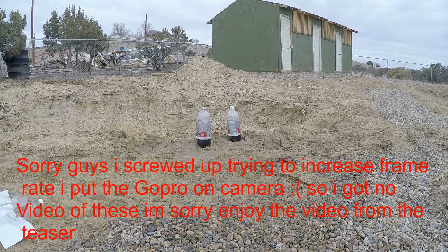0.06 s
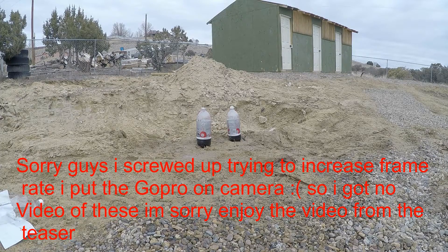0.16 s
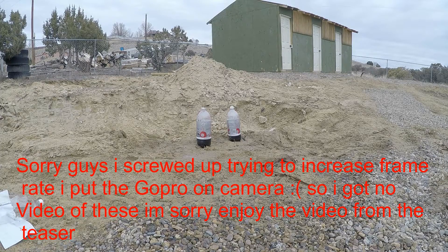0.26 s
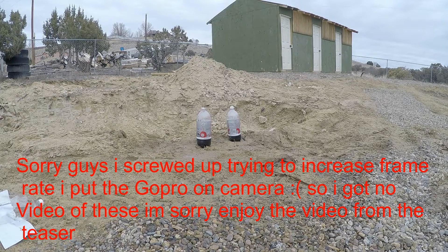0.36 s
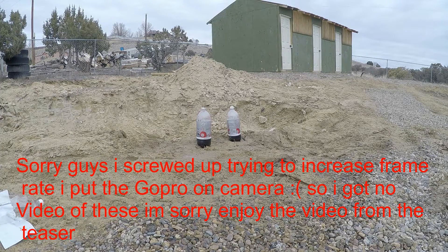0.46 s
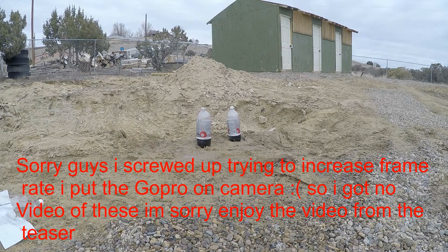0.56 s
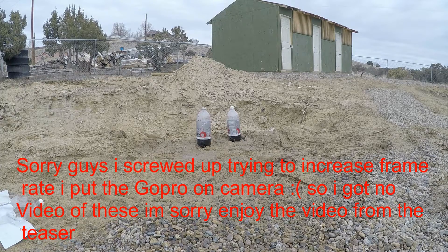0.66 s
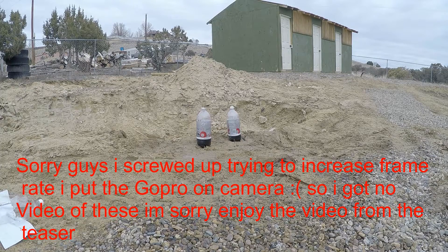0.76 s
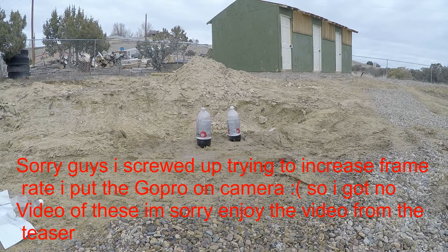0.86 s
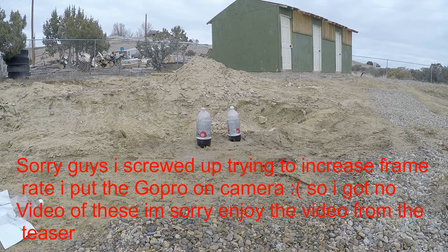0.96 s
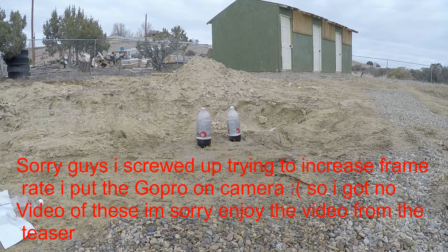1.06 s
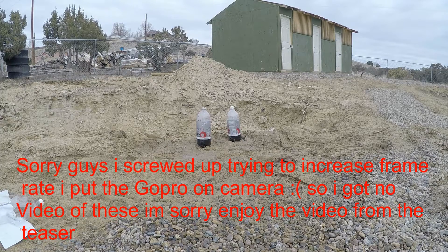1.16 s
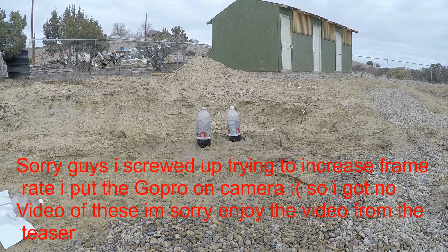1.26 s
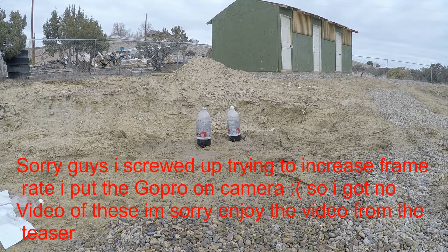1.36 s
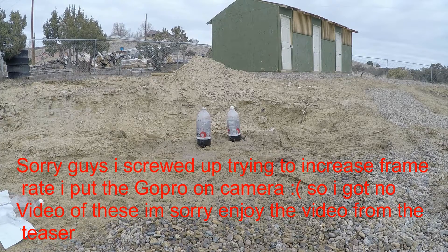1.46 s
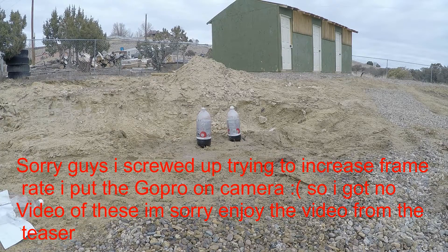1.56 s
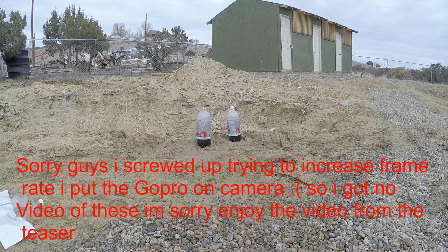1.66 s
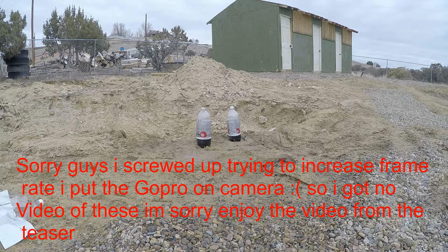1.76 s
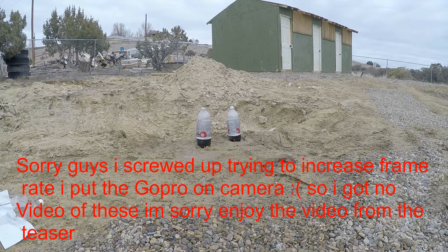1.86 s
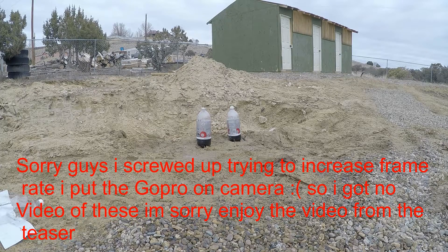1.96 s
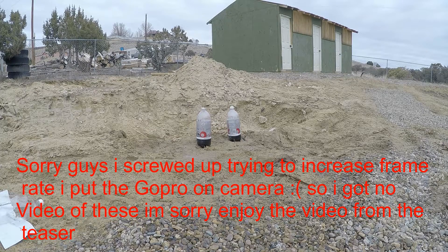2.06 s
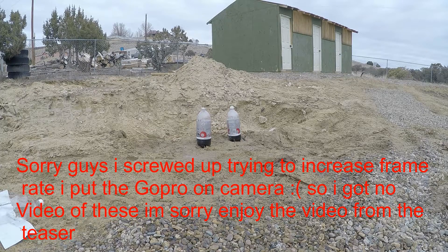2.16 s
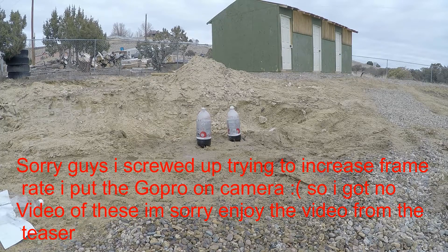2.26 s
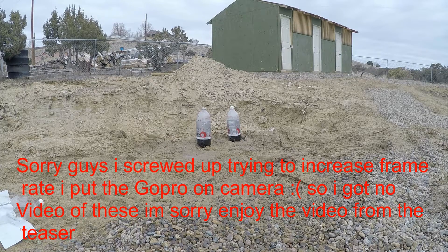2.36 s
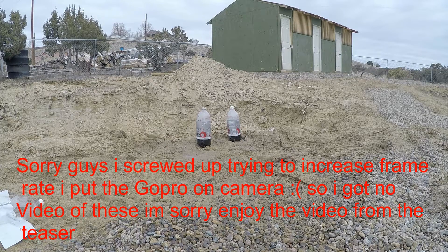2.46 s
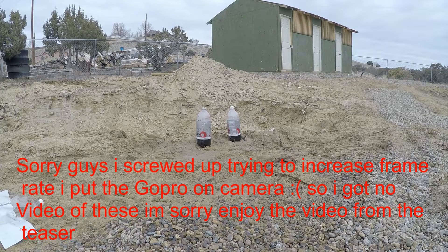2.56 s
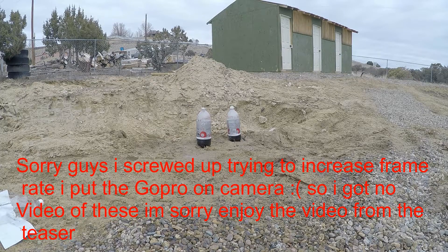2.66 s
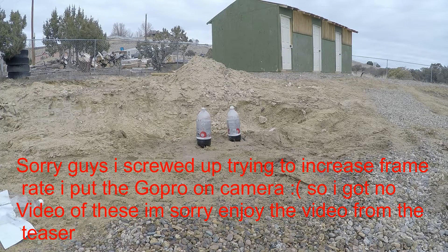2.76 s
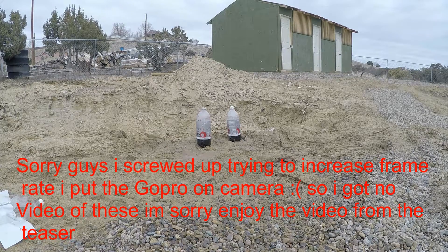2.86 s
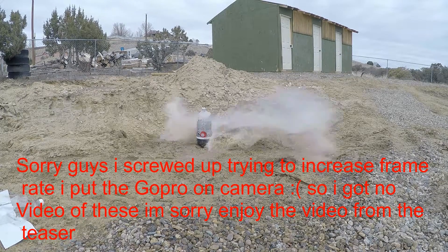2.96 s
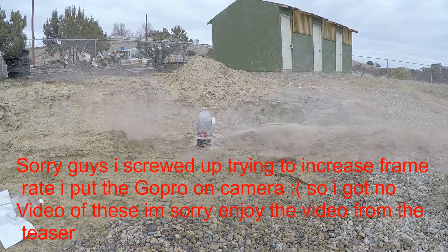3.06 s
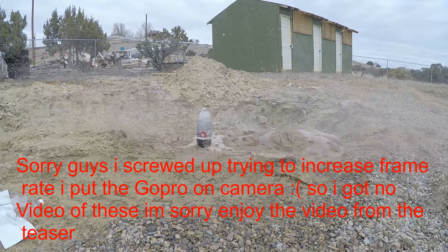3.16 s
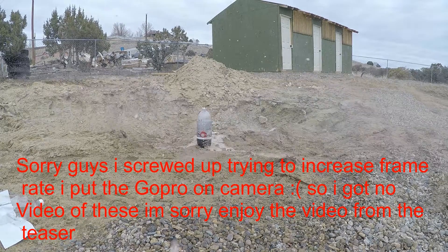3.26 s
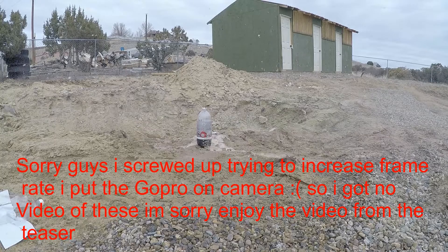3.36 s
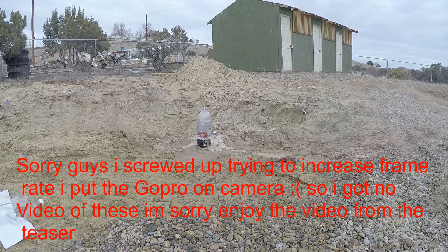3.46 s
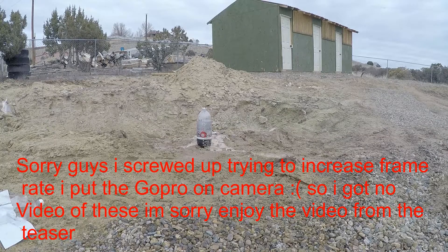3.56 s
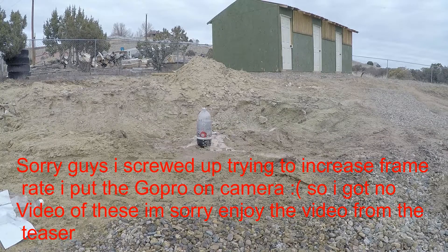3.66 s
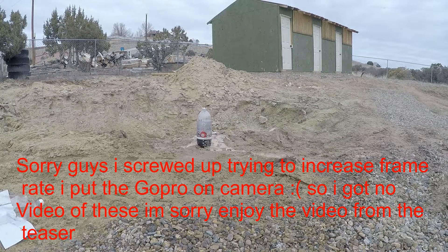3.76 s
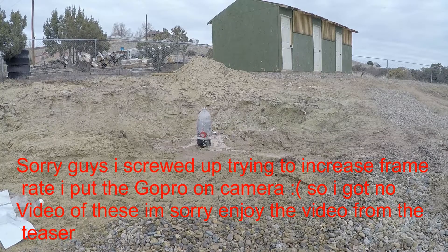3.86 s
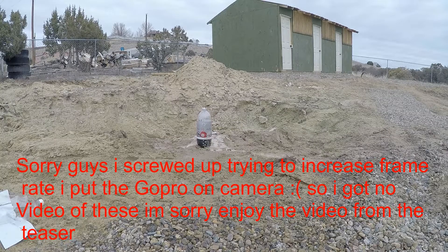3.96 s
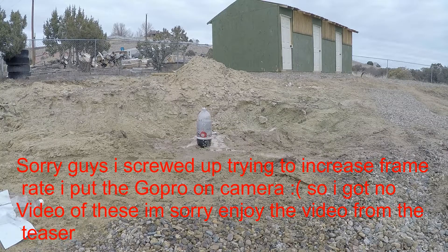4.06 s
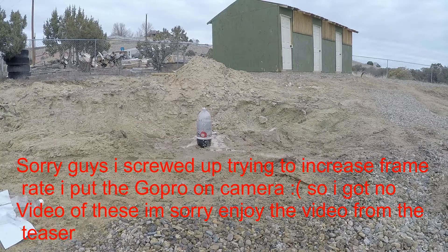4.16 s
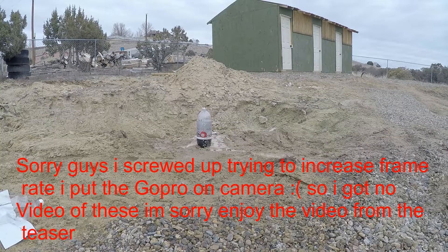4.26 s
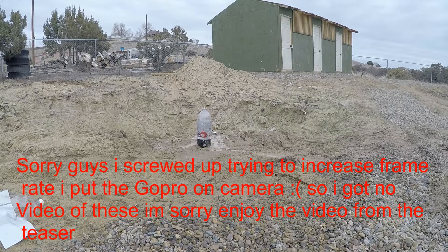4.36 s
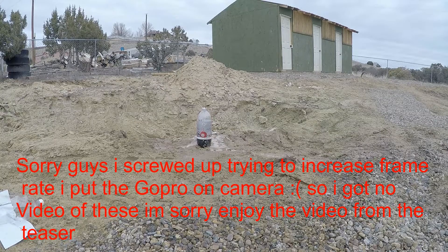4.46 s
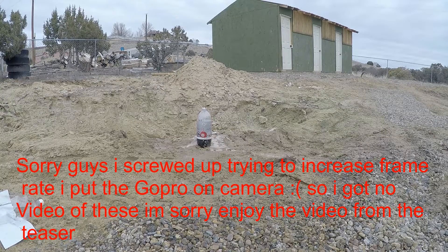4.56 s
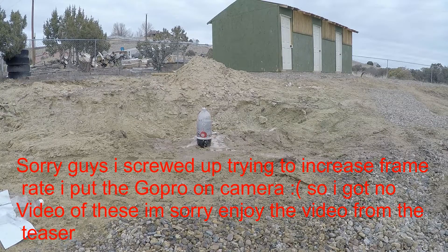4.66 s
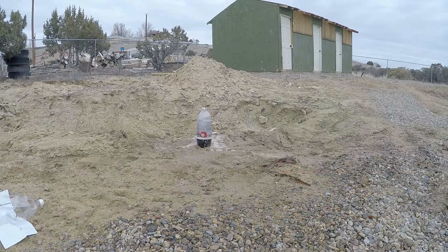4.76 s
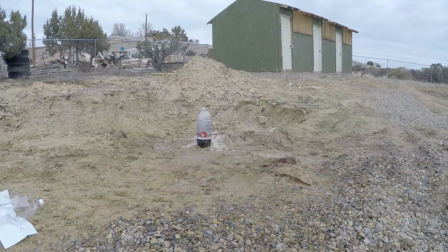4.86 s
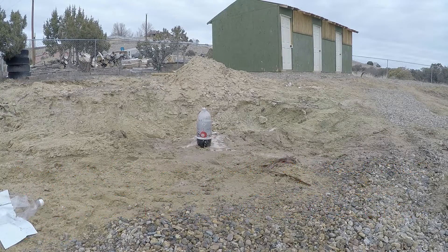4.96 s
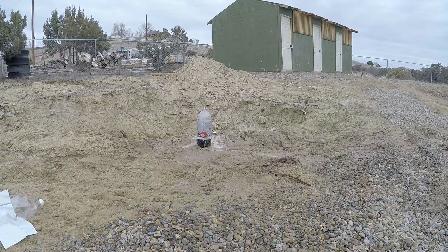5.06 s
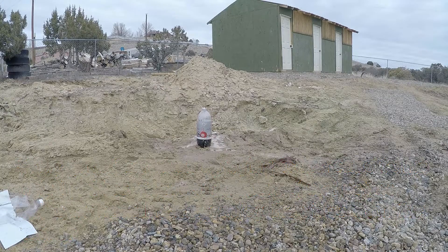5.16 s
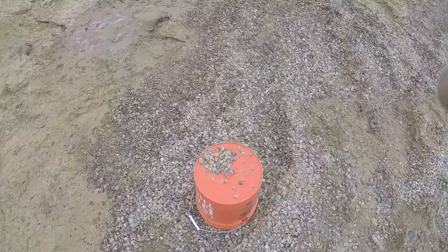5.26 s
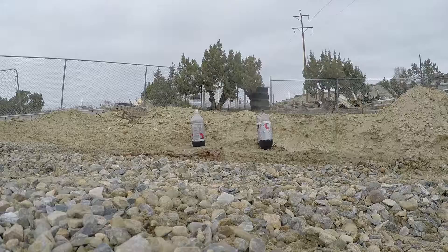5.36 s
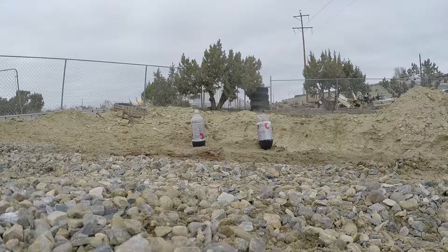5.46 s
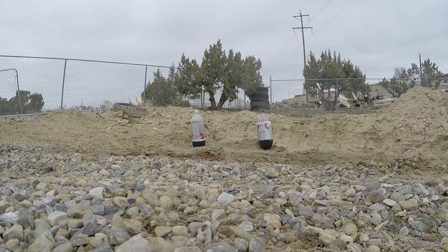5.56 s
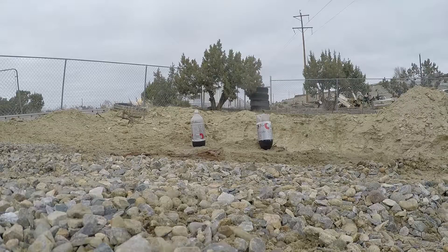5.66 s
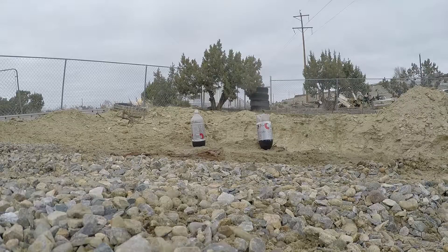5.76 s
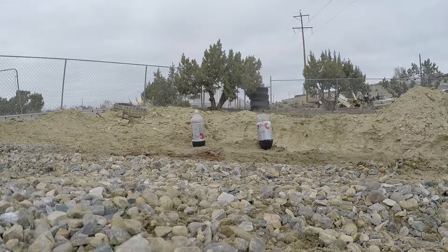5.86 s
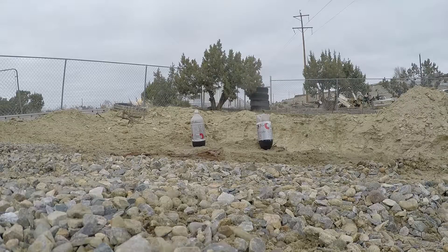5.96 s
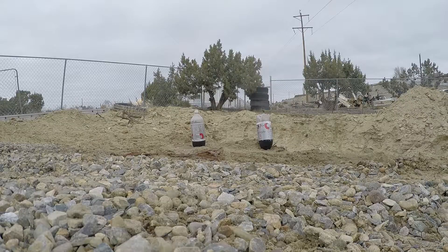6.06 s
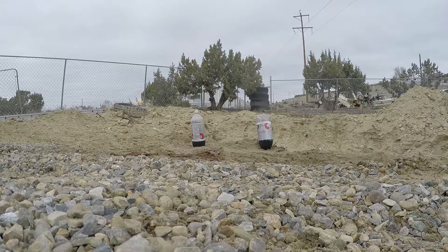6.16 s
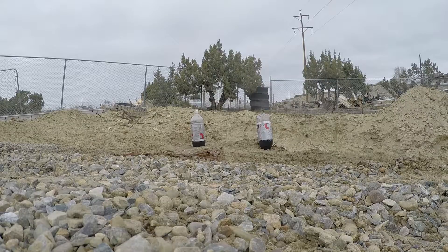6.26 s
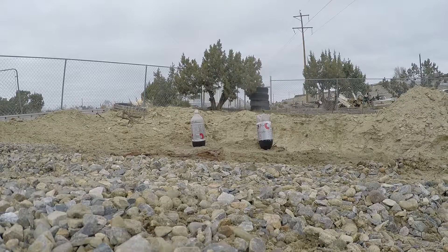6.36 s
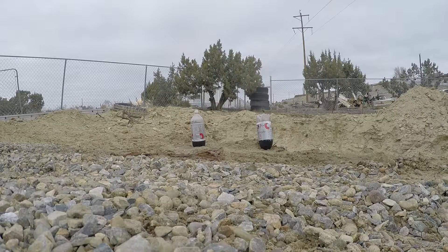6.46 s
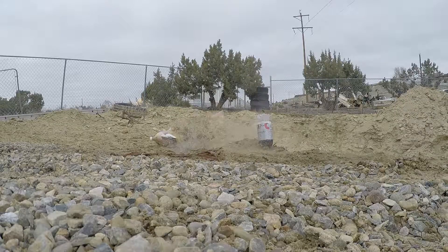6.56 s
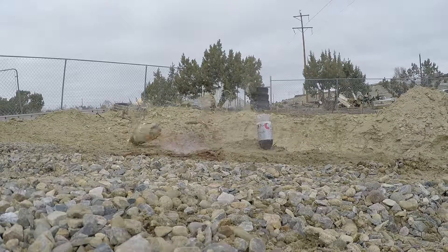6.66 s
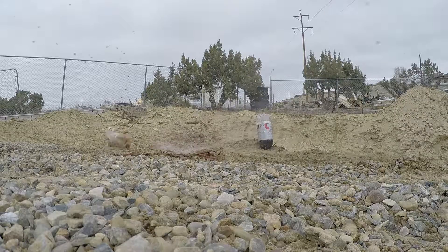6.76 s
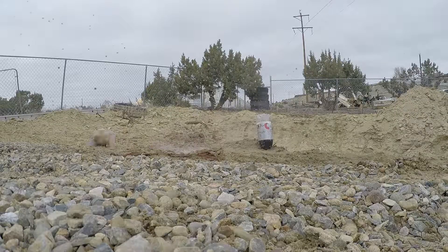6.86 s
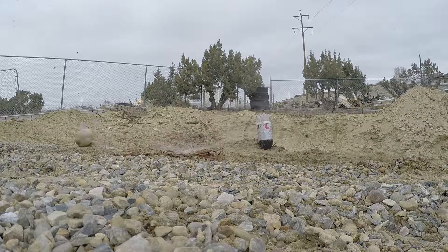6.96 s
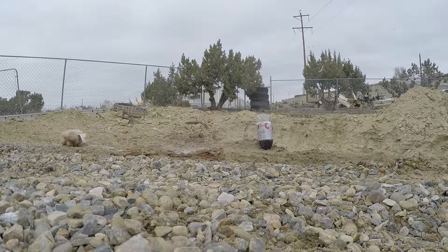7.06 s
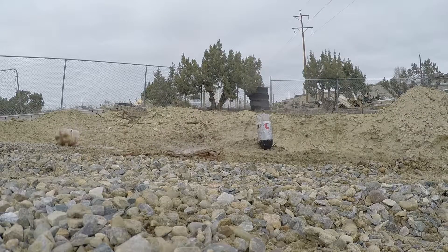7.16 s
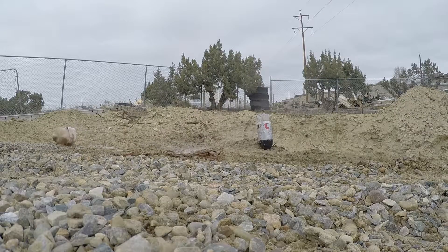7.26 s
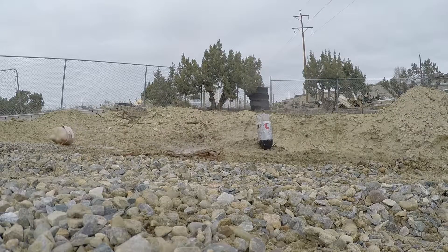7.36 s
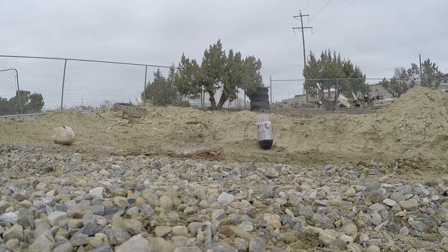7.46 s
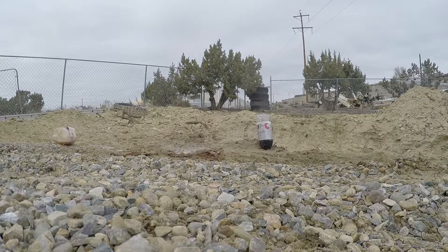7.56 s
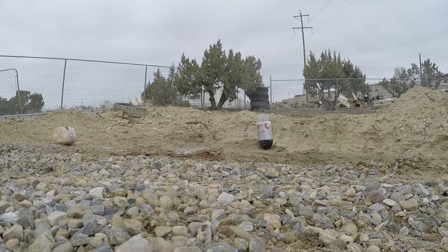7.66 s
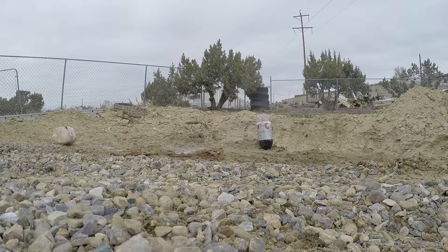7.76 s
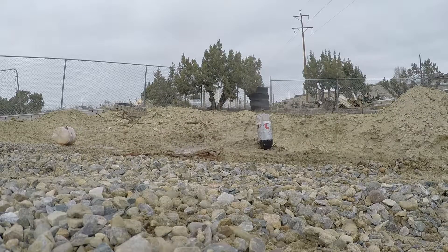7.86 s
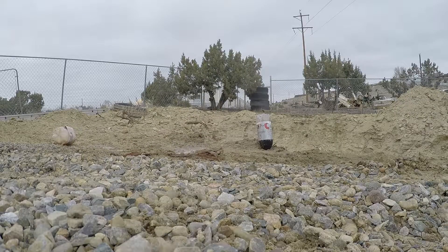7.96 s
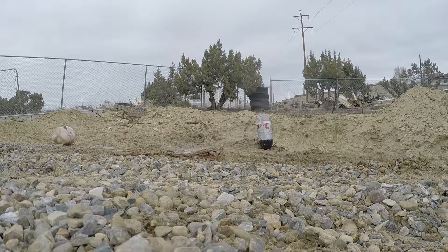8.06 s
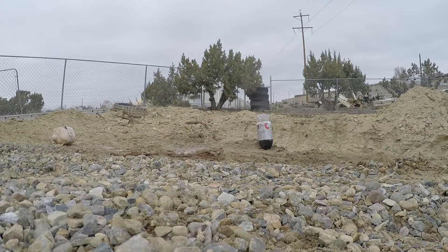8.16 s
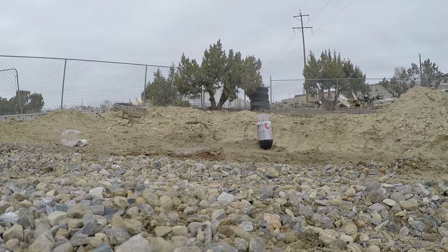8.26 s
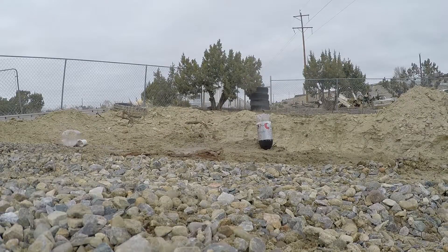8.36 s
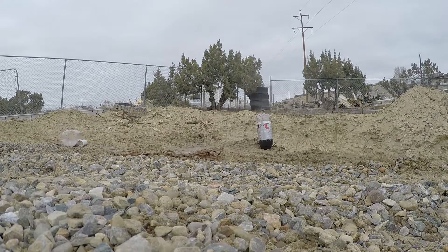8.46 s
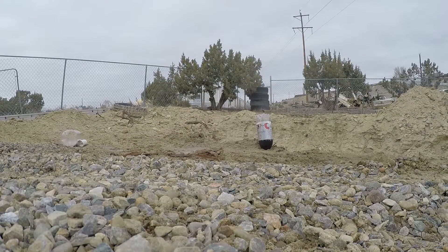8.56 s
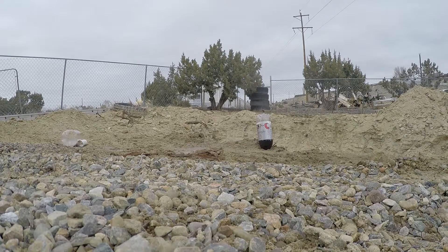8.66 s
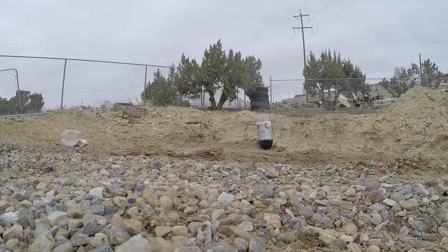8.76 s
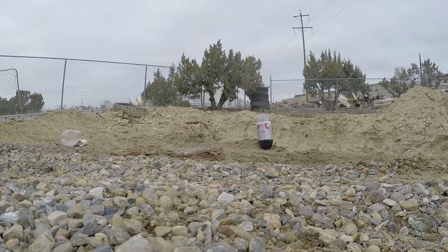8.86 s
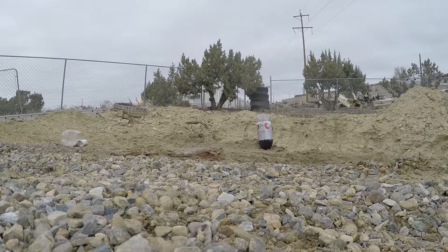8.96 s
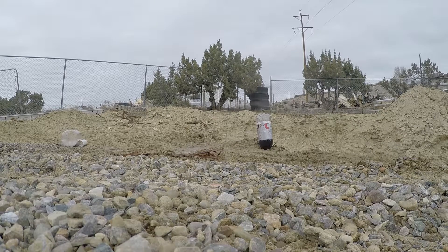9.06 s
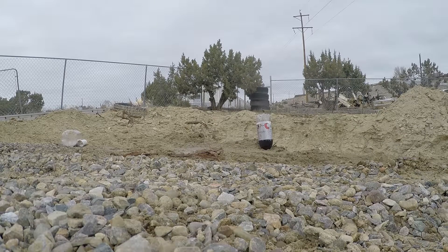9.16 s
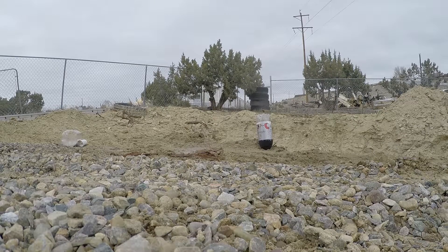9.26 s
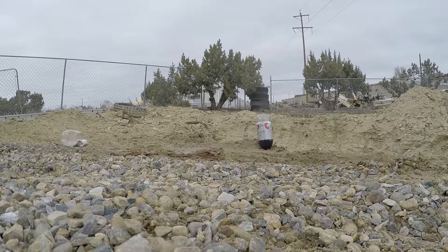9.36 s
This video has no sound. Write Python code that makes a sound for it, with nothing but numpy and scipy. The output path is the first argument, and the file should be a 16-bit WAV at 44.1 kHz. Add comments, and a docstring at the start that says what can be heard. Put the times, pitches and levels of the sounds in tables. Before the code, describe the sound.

A far bird calls faintly, then a plastic bottle explodes, a brief thump follows, and a second bottle bursts, scattering debris.

```python
"""Dry ice bottle bombs

Two plastic bottles charged with dry ice burst on a dirt lot, a few metres from a small camera.
Each wall splits, then lets go in a blast that overloads the microphone; the banks throw it back
and grit rains down. A far bird calls before the first burst. Between the two bursts comes a
short thump, broken off by a moment of silence."""
import sys
import numpy as np
from scipy import signal
from scipy.fft import rfft, irfft, next_fast_len
from scipy.io import wavfile
from scipy.ndimage import uniform_filter1d

SR = 44100
rng = np.random.default_rng(int(sys.argv[2]) if len(sys.argv) > 2 else 0)


def generate_wav(sig):
    """Save sig (samples, or channels by samples) to the path in sys.argv[1] as 16-bit PCM at SR."""
    pcm = np.round(np.clip(np.atleast_2d(sig).T, -1, 1) * 32767).astype(np.int16)
    wavfile.write(sys.argv[1], SR, pcm)


N = 414540
T = np.arange(N) / SR
SILENCE_FROM_S, SILENCE_TO_S = 5.309, 5.357

# pressure waves: start_s, level_db, push_s, suction_s, echo_delay_s, echo_db
BLASTS = [(3.006, 6, .0015, .0016, .0185, -12), (6.5478, 7.5, .0017, .0026, .0232, -12)]
# the walls crack just before each blast: start_s, level_db
SPLITS = [(2.9574, -31.5), (2.9601, -14.5), (2.9968, -25), (2.9998, -24.5), (3.0046, -13), (6.5053, -21.5),
          (6.5084, -17.5), (6.5452, -10.5)]
SPLIT_COLOUR = [(88, -42), (150, -14), (462, -25), (894, -21), (1600, -8), (2060, -10.5), (2600, 2),
                (3040, -13), (3480, -4), (4400, -5), (5300, -20), (8010, -20.5), (8830, -32.5),
                (13000, -30.5), (15500, -39)]  # freq_hz, level_db
# each wall tears apart: start_s, level_db, hold_s, t60_s, top_hz
SHREDS = [(3.0088, -.7, .0095, .045, 4497), (6.5456, 2.5, .003, .021, 9500)]
# resonances, one list per bottle: pitch_hz, width_hz, level_db
SHELL_MODES = [
    [(662, 62, -10.5), (1540, 82, -1), (2205.6, 31, -6), (2428.5, 130, -6.5), (2780, 39, -8),
     (2981, 29, -9), (3171, 58, -10), (4230, 41, -23), (5871, 180, -26.5)],
    [(1400, 240, -6.5), (1750, 90, -9), (2340, 90, -5), (2820, 150, -10), (3356, 120, 4), (3694, 160, 0),
     (5130, 300, -6), (6560, 300, -12), (7660, 96, -17), (7990, 65, -26), (9480, 300, -23),
     (11700, 350, -27.5)],
]
# after-ring of the torn shells: start_s, pitch_hz, width_hz, level_db, t60_s
SHELL_RINGS = [(3.02, 2942, 160.6, -29, .13), (6.553, 2797, 10, -18.5, .14), (6.553, 1830, 25, -33, 0.19),
               (6.59, 1680, 110, -42, 0.37), (6.59, 3550, 350, -45, .9)]
# the lot's reverb: start_s, rumble_db, rumble_t60_s, bright_db, bright_t60_s
SCATTER = [(3.018, -11, 0.43, -13.5, .18), (6.555, -20.5, .44, -26.5, 0.34)]
# its dark and bright layers, one list per burst: freq_hz, level_db
RUMBLE_COLOURS = [
    [(26, -29.5), (45, 3), (76, -5.5), (111, 1.5), (139, -5), (194, -5), (230, -5), (575, -35),
     (650, -33.5), (840, -65), (1430, -120)],
    [(26, -20), (45, -6), (70, -0.5), (119, -5), (145, 1), (188, -4), (266, -7.5), (348, -16.5), (650, -39),
     (840, -45), (1430, -120)],
]
BRIGHT_COLOURS = [
    [(350, -47), (600, -17), (734, -0.5), (840, -19), (1190, -5), (1500, -10), (1650, 1.5), (1960, -6),
     (2900, -2.5), (3500, -16.5), (5250, -19), (7650, -34), (8520, -40.5), (12800, -46), (15000, -51.5)],
    [(470, -51), (800, -19.5), (938, -22), (1400, -13), (1630, -1.5), (2030, -16.5), (2270, -4),
     (2860, -3.5), (3080, -8.5), (3530, 1.5), (4250, -21), (4900, -9), (6280, -16), (9070, -29.5),
     (15000, -38)],
]
# the camera's support shakes after a shock: start_s, pitch_hz, level_db, t60_s
SWAYS = [(3.01, 51, -32.5, 1.5), (3.01, 16.1, -34.5, 2.2), (6.797, 32.3, -42.5, 3.1)]
# a piece of bottle lands close by: start_s, click_db, scatter_db, scatter_t60_s
KNOCK = (6.7963, -4, -16, 0.0232)
KNOCK_COLOUR = [(59, -41), (100, -7), (258, -5), (477, -41), (1160, -2.5), (1960, -6), (2810, 1),
                (4190, -28), (4750, -16), (5400, -33), (9540, -27), (10600, -33), (13700, -19),
                (15500, -40)]  # freq_hz, level_db
KNOCK_MODES = [(1814, 2.5, 0.22), (2799, -1, 0.14)]  # pitch_hz, relative_db, t60_s
# chips tick on the near stones: start_s, level_db, t60_s
CHIPS = [(7.192, -34, 0.014), (7.2036, -43, 0.014), (7.2064, -48.5, 0.022)]
CHIP_COLOUR = [(590, -54), (1000, -36), (1940, -2), (2390, -3), (2710, -7.5), (3570, -12), (6410, 1),
               (11000, -20), (13700, -1), (15500, -17.5)]  # freq_hz, level_db
# clods and scraps landing, and other small taps: start_s, level_db, pitch_hz
TAPS = [(1.004, -45, 3000), (3.214, -50, 2440), (3.293, -49.5, 2600), (3.348, -48, 504), (3.547, -53, 1587),
        (3.595, -55, 715), (3.674, -52, 1167), (3.728, -54.5, 2416), (4.708, -58, 3380), (4.784, -54, 2450),
        (4.812, -47, 2700), (6.939, -53, 1774)]
# showers of fine grit: middle_s, spread_s, level_db
GRIT_SHOWERS = [(3.19, 0.055, -60), (3.4, .09, -59), (3.76, .04, -71), (4.85, 0.042, -68),
                (6.7, 0.089, -58), (7.06, .14, -66.5)]
# the thump's rattle: start_s, level_db, t60_s
THUMP_RATTLE = [(5.265, -24.5, 0.026), (5.268, -37, 0.28)]
RATTLE_COLOUR = [(530, -48), (900, -19), (1440, -12), (1700, -13), (2080, -1), (2820, -11.5), (3650, 0),
                 (5260, -24.5), (6350, -19), (9480, -38), (12600, -22), (15000, -44)]  # freq_hz, level_db
THUMP_CLICK_COLOUR = [(100, -2), (400, -3.5), (750, -4.5), (1400, -5.5), (1700, -14), (2350, 2.5),
                      (3100, -16), (3800, -11), (7000, -26), (10000, -46), (13000, -34)]  # freq_hz, level_db
# the bird's calls: start_s, hold_s, pitch_hz, sag_hz_per_s, whistle_db, fade_db, fall_db
BIRD_CALLS = [(0.976, .365, 3635, 50, -62, 6, -57.5), (2.345, .415, 3750, 270, -52.5, 18, -55.5)]
# a call's hoarse edges: from_s, to_s, start_hz, end_hz, width_hz, level_db (re the falling note)
RASP_IN = (-.068, 0, 2630, 3600, 230, -5)  # timed from the whistle's start
RASP_UNDER = (0.04, 0.45, 2700, 2500, 700, -15.5)  # likewise
RASP_BREAK = (-0.11, 0.07, 2770, 2680, 60, -9)  # timed from the break into the falling note
RASP_OUT = (0.14, 0.28, 2850, 2714, 230, -5)  # likewise
# the hoarse end of a call opens the scene: from_s, to_s, start_hz, end_hz, width_hz, level_db
HOARSE_NOTES = [(-.1, 0.2, 2570, 2480, 35, -61.5), (-.08, 0.091, 3530, 3480, 40, -67),
                (.06, 0.17, 3080, 2880, 160, -66)]
# still air before and after the silence: freq_hz, level_db
AIR_EARLY = [(12, -34), (20, -2), (70, -6), (109, -0.5), (148, -12.5), (266, -19), (404, -21), (581, -23.5),
             (705, -24.5), (2540, -25), (7950, -33), (10200, -35.5), (14300, -36.5), (15500, -38.5)]
AIR_LATE = [(12, -29), (20, 0.5), (45, -1.5), (70, -5.5), (92, -14), (153, -14.5), (213, -21), (266, -18.5),
            (352, -23.5), (4680, -29.5), (7950, -35), (12100, -38), (14300, -36), (15500, -41.5)]
# the camera's electronics
CAMERA_WHINE = [(8629, -81.5), (14088, -91)]  # pitch_hz, level_db
CAMERA_HISS = [(4740, 250, -85), (9470, 300, -87), (14240, 400, -80)]  # centre_hz, width_hz, level_db


def blasts(low_hz=110, top_hz=900, echo_top_hz=300):
    """The punch: gas leaps out as a push and a suction; the dirt bank returns a dull copy."""
    out = np.zeros(N)
    for start, db, push, suction, delay, echo_db in BLASTS:
        wave = from_db(db) * push_pull(start, push, suction)
        echo = butter(np.interp(T - delay, T, np.maximum(wave, 0)), echo_top_hz, "low")
        out += butter(wave, top_hz, "low") + from_db(echo_db) * echo
    return butter(out, low_hz, "high", order=1)  # the microphone rebounds


def splits(t60_s=.017, tail_delay_s=.0018, tail_db=-20, tail_t60_s=.11):
    """Each split of a wall is a sharp snap with a weak tail."""
    cracks = [(start, db, t60_s) for start, db in SPLITS]
    tails = [(start + tail_delay_s, db + tail_db, tail_t60_s) for start, db in SPLITS]
    return snaps(cracks + tails, SPLIT_COLOUR)


def shreds(attack_s=.001):
    """The crunch: tearing plastic drives each shell's resonances for an instant."""
    out = np.zeros(N)
    for (start, db, hold, t60, top_hz), modes in zip(SHREDS, SHELL_MODES):
        tear = butter(rng.standard_normal(N), top_hz, "low")
        ring = sum((-1) ** k * from_db(level) * resonate(tear, hz, width)
                   for k, (hz, width, level) in enumerate(modes))
        out += from_db(db) * decay(start, t60, hold) * ramp(start, attack_s) * evened(ring)
    return out


def shell_rings():
    """Floppy torn plastic rings on with rough, noisy notes."""
    out = np.zeros(N)
    for start, hz, width, db, t60 in SHELL_RINGS:
        ring = evened(resonate(rng.standard_normal(N), hz, width), size=600)
        out += from_db(db) * decay(start, t60) * ring
    return out


def lot_reverb(lumps_db=2.5, lumps_hz=160):
    """Banks, fence and trees scatter each bang in many small echoes; the lows outlast the highs."""
    out = np.zeros(N)
    lumps = rms_one(from_db(lumps_db * wander(lumps_hz)))
    for scatter, rumble, bright in zip(SCATTER, RUMBLE_COLOURS, BRIGHT_COLOURS):
        start, rumble_db, rumble_t60, bright_db, bright_t60 = scatter
        out += from_db(rumble_db) * decay(start, rumble_t60) * evened(coloured(rumble), size=1200)
        out += from_db(bright_db) * decay(start, bright_t60) * lumps * coloured(bright)
    return out


def far_echoes(delay_s=.54, spread_s=.089, level_db=-61.5):
    """Far slopes return each blast as a faint, dull swell."""
    swells = sum(bell_curve(start + delay_s, spread_s) for start, *_ in BLASTS)
    return from_db(level_db) * swells * narrow_noise(hz=150, width_hz=125)


def sways():
    """The sub tail: the camera's shaken support rings on, very low."""
    return sum(damped_sine(*sway) for sway in SWAYS)


def knock(ring_db=-40, tail_db=-47, tail_t60_s=.25):
    """A flying piece lands hard, its plastic rings and the lot returns a short tail."""
    start, click_db, scatter_db, scatter_t60 = KNOCK
    contact = from_db(click_db) * click(start, KNOCK_COLOUR)
    ring = sum(damped_sine(start, *mode) for mode in KNOCK_MODES)
    tail = snaps([(start, scatter_db, scatter_t60), (start, tail_db, tail_t60_s)], KNOCK_COLOUR)
    return contact + from_db(ring_db) * ring + tail


def chips():
    """Flying chips hit the near stones with bright, dry ticks."""
    return snaps(CHIPS, CHIP_COLOUR)


def scraps(count=4, from_s=3.36, span_s=.62, level_db=-58.5, pitch_hz=2900):
    """Light scraps land at random after the first burst, ever more rarely: extra rows for taps."""
    turns = (np.arange(count) + rng.random(count)) / count
    return [(from_s + span_s * turn ** 2, level_db + 3 * size, pitch_hz * 2 ** (.2 * detune))
            for turn, (size, detune) in zip(turns, rng.standard_normal((count, 2)))]


def taps(trim_db=-2, t60_s=.048, width_share=.7, attack_cycles=3):
    """Small landings on soft ground, each with one broad resonance."""
    out = np.zeros(N)
    for start, db, hz in TAPS + scraps():
        attack = attack_cycles / hz
        body = evened(narrow_noise(hz, hz * width_share), size=300)
        out += from_db(db + trim_db) * ramp(start, attack) * decay(start, t60_s, attack) * body
    return out


def grit(grains_per_s=1100, pitch_hz=2300, width_hz=2000):
    """Grains and drops of uneven size patter back on the ground."""
    grains = (rng.random(N) < grains_per_s / SR) * rng.standard_normal(N)
    showers = sum(from_db(db) * bell_curve(middle, spread) for middle, spread, db in GRIT_SHOWERS)
    return showers * rms_one(resonate(resonate(grains, pitch_hz, width_hz), pitch_hz, width_hz))


def thump(start_s=5.267, swing_db=-13, t60_s=.21, top_hz=170, click_db=-7):
    """A click and a thin rattle ride on one deep swing; it ends where the silence begins."""
    swing = from_db(swing_db) * decay(start_s, t60_s) * push_pull(start_s, push_s=.0126, suction_s=.0287)
    edge = from_db(click_db) * click(start_s, THUMP_CLICK_COLOUR)
    rattle = snaps(THUMP_RATTLE, RATTLE_COLOUR)
    return (butter(swing, top_hz, "low") + edge + rattle) * (T < SILENCE_FROM_S)


def bird(jitter=.004, flutter_db=3, flutter_hz=30, lower_voice_db=-15.5):
    """Each call rasps upward, holds a two-voiced whistle, breaks into a falling note and ends hoarse."""
    out = sum(rasp(note) for note in HOARSE_NOTES)
    waver = 1 + jitter * wander(120)
    for start, hold, hz, sag, db, fade_db, fall_db in BIRD_CALLS:
        out += whistle(start, hold, hz, sag, db, fade_db, fall_db + lower_voice_db, waver)
        out += falling_note(start + hold, fall_db, waver)
        out += rasp(RASP_IN, start, fall_db) + rasp(RASP_UNDER, start, fall_db)
        out += rasp(RASP_BREAK, start + hold, fall_db) + rasp(RASP_OUT, start + hold, fall_db)
    return np.sqrt(2) * out * from_db(flutter_db * wander(flutter_hz))


def whistle(start, hold, hz, sag, db, fade_db, lower_db, waver, overtone_db=-73, overtone_fade_db=18):
    """Two voices sag and fade together; the upper has an octave, and the pair makes a sum tone."""
    lower_ratio, lower_sag_ratio, lower_jitter = .55, 2.2, .013
    age = np.clip(T - start, 0, hold)
    fade = (age / hold) ** 2
    upper = phase_of((hz - sag * age) * waver)
    lower = phase_of((hz * lower_ratio - lower_sag_ratio * sag * age) * (1 + lower_jitter * wander(150)))
    voices = from_db(db - fade_db * fade) * np.sin(upper)
    voices += from_db(lower_db - .5 * overtone_fade_db * fade) * np.sin(lower)
    overtones = np.sin(2 * upper) + np.sin(upper + lower)
    opening = gate(start - .03, start + hold, attack_s=.06, release_s=.03)
    return opening * (voices + opening * from_db(overtone_db - overtone_fade_db * fade) * overtones)


def falling_note(start, db, waver, length_s=.21, swell_db=3, first_db=-14.5, third_db=-15):
    """One voice slides down and swells, its second harmonic the strongest."""
    from_hz, toward_hz, settle_s = 3300, 2780, .14  # glide of the second harmonic
    age = np.clip(T - start, 0, length_s)
    glide_hz = toward_hz + (from_hz - toward_hz) * np.exp(-age / settle_s)
    phase = phase_of(glide_hz / 2 * waver ** 2)
    first = from_db(first_db) * np.sin(phase)
    second = from_db(-swell_db * (1 - age / length_s)) * np.sin(2 * phase)
    third = from_db(third_db) * (1 - .5 * age / length_s) * np.sin(3 * phase)
    opening = gate(start, start + length_s, attack_s=.02, release_s=.04)
    return from_db(db) * opening * (first + second + third)


def rasp(note, cue_s=0, level_db=0):
    """A hoarse glide: a narrow band of noise that swells and fades, timed from its cue."""
    start, end, start_hz, end_hz, width_hz, db = note
    along = np.clip((T - cue_s - start) / (end - start), 0, 1)
    swell = np.sqrt(np.abs(np.sin(np.pi * along)))
    glide = np.sin(phase_of(start_hz + (end_hz - start_hz) * along))
    return from_db(db + level_db) * swell * wander(width_hz) * glide


def far_away(x, wet_db=-4, t60_s=.25):
    """Many late, weak paths smear a distant sound and make its level flutter."""
    paths = rng.standard_normal(SR // 2) * decay(0, t60_s)[:SR // 2]
    late = signal.fftconvolve(x, paths / np.linalg.norm(paths))[:N]
    return (x + from_db(wet_db) * late) / np.hypot(1, from_db(wet_db))


def background(early_db=-60.5, late_db=-60):
    """The bed: quiet outdoor air, with the thin whine and hiss of the camera."""
    early_air = from_db(early_db) * coloured(AIR_EARLY)
    late_air = from_db(late_db) * coloured(AIR_LATE)
    whine = sum(np.sqrt(2) * from_db(db) * np.sin(2 * np.pi * hz * T) for hz, db in CAMERA_WHINE)
    hiss = sum(from_db(db) * narrow_noise(hz, width) for hz, width, db in CAMERA_HISS)
    return np.where(T < SILENCE_FROM_S, early_air, late_air) + whine + hiss


def from_db(db):
    """Decibels to gain."""
    return 10 ** (np.asarray(db) / 20)


def rms_one(x):
    """Scale to rms 1."""
    return x / np.sqrt(np.mean(x ** 2) + 1e-20)


def butter(x, hz, kind, order=2):
    """Causal Butterworth filter."""
    return signal.sosfilt(signal.butter(order, hz, kind, fs=SR, output="sos"), x + 1e-18)


def resonate(x, hz, width_hz):
    """One resonance, gain 1 at its peak."""
    radius = np.exp(-np.pi * width_hz / SR)
    feedback = [1, -2 * radius * np.cos(2 * np.pi * hz / SR), radius ** 2]
    return signal.lfilter(np.array([1, 0, -1]) * (1 - radius ** 2) / 2, feedback, x + 1e-18)


def decay(start, t60, hold=0):
    """Jumps to 1, holds, then falls 60 dB in t60."""
    return (T >= start) * np.exp(-np.log(1000) * np.clip((T - start - hold) / t60, 0, 10))


def ramp(start, length_s):
    """Straight fade-in."""
    return np.clip((T - start) / length_s, 0, 1)


def gate(start, end, attack_s, release_s):
    """Fades in from start, holds, and has faded out by end."""
    return ramp(start, attack_s) * (1 - ramp(end - release_s, release_s))


def bell_curve(middle_s, spread_s):
    """A smooth swell and fade."""
    return np.exp(-.5 * ((T - middle_s) / spread_s) ** 2)


def push_pull(start, push_s, suction_s):
    """One pressure swing: half a sine up, half a sine down."""
    return np.sin(np.pi * np.interp(T - start, [0, push_s, push_s + suction_s], [0, 1, 2]))


def damped_sine(start, hz, db, t60):
    """One struck mode dying away."""
    return from_db(db) * decay(start, t60) * np.sin(2 * np.pi * hz * (T - start))


def phase_of(hz):
    """Running phase of a moving pitch."""
    return 2 * np.pi * np.cumsum(hz) / SR


def wander(hz):
    """Random drift of rms 1, rolled off above hz."""
    return rms_one(butter(rng.standard_normal(N), hz, "low"))


def narrow_noise(hz, width_hz):
    """Noise of rms 1 in one steep-sided band."""
    return rms_one(resonate(resonate(rng.standard_normal(N), hz, width_hz), hz, width_hz))


def eq_curve(colour, size):
    """Gain per FFT bin through points of freq_hz, level_db."""
    hz, db = np.transpose(colour)
    bins = np.maximum(np.arange(size // 2 + 1) * SR / size, 1)
    return from_db(np.interp(np.log(bins), np.log(hz), db))


def coloured(colour):
    """Noise of rms 1 with a given colour."""
    size = next_fast_len(N)
    return rms_one(irfft(rfft(rng.standard_normal(size)) * eq_curve(colour, size), size)[:N])


def evened(x, size=96):
    """Irons the chance swells out of a noise, so that a short hit keeps its punch."""
    return x / np.sqrt(uniform_filter1d(x ** 2, size) + 1e-12)


def snaps(hits, colour):
    """Sudden, fast-dying noise hits of one colour: start_s, level_db, t60_s."""
    return evened(coloured(colour)) * sum(from_db(db) * decay(start, t60) for start, db, t60 in hits)


def click(start, colour, size=4096):
    """The tightest causal pulse with a given colour (minimum phase), peak 1."""
    cepstrum = irfft(np.log(eq_curve(colour, size)))
    pulse = irfft(np.exp(rfft(2 * cepstrum[:size // 2], size)))
    return np.interp(np.arange(N) - round(start * SR), np.arange(size), pulse / np.abs(pulse).max(), 0, 0)


def gain_control(x, limit_db=-3, sink_db_per_s=600, hold_s=.22, release_s=.71):
    """The gain ducks for as long as the input is too loud, waits, then creeps back."""
    power = uniform_filter1d(x ** 2, size=128) / from_db(limit_db) ** 2
    too_loud = power ** 2 / (1 + power ** 2)
    memory = np.interp(T[:2 * SR], [hold_s, hold_s + release_s], [1, 0])
    return x * from_db(-sink_db_per_s * signal.fftconvolve(too_loud, memory)[:N] / SR)


def scene():
    """The mono mix at the microphone."""
    bursts = splits() + blasts() + shreds() + shell_rings() + lot_reverb() + far_echoes() + sways()
    debris = knock() + chips() + taps() + grit()
    return (bursts + debris + thump() + far_away(bird()) + background())[None]


def record(dry):
    """Gain control, soft overload, a moment of silence and a steep top cut."""
    ceiling, cutoff_hz = .93, 15400
    ducked = gain_control(dry[0])
    saturated = ducked / (1 + (ducked / ceiling) ** 6) ** (1 / 6)
    gated = saturated * ((T < SILENCE_FROM_S) | (T > SILENCE_TO_S))
    top_cut = signal.firwin(201, cutoff_hz, window="blackmanharris", fs=SR)
    return signal.fftconvolve(gated, top_cut, "same")[None]


dry = scene()
out = record(dry)
generate_wav(out)
```